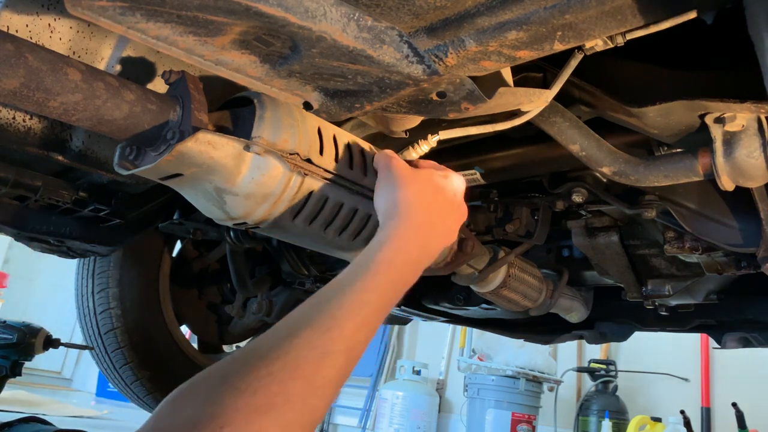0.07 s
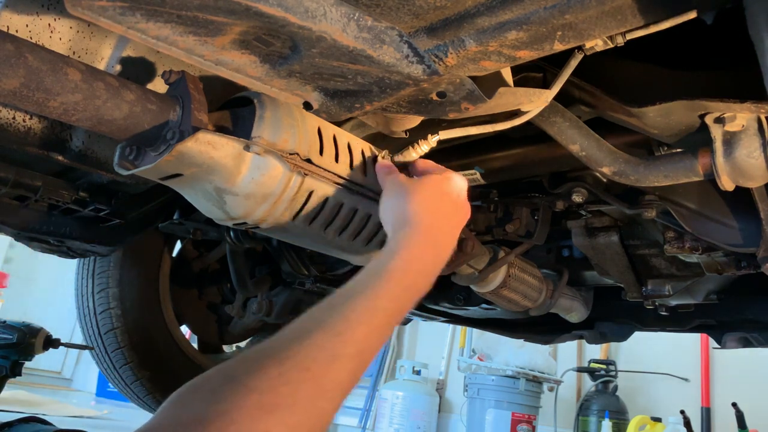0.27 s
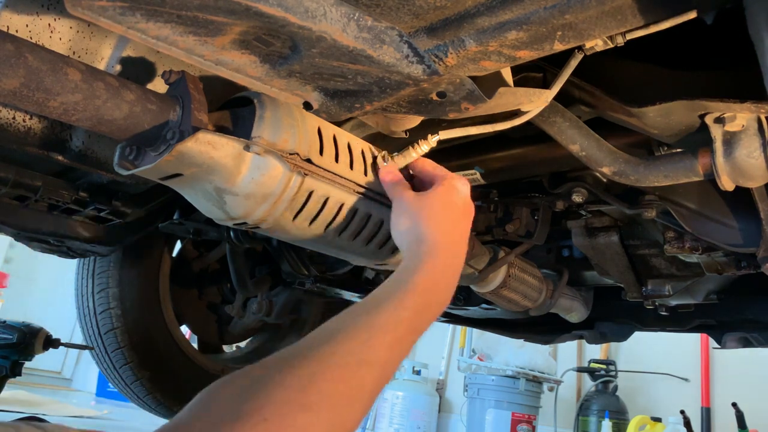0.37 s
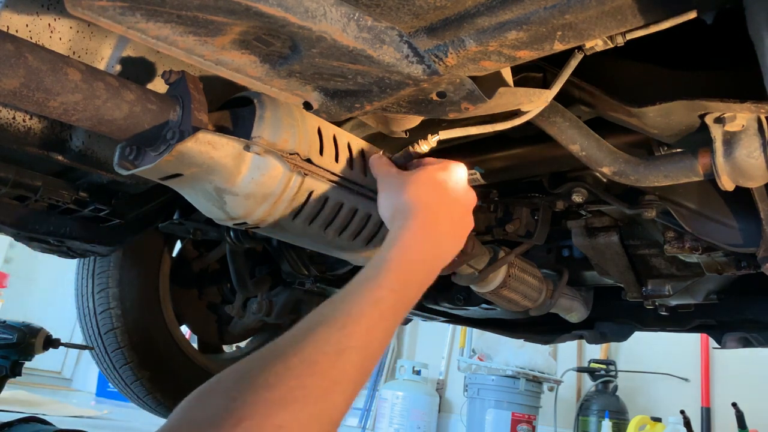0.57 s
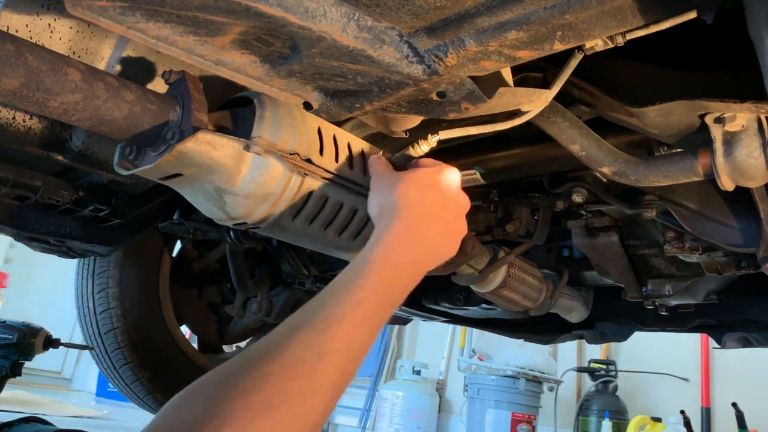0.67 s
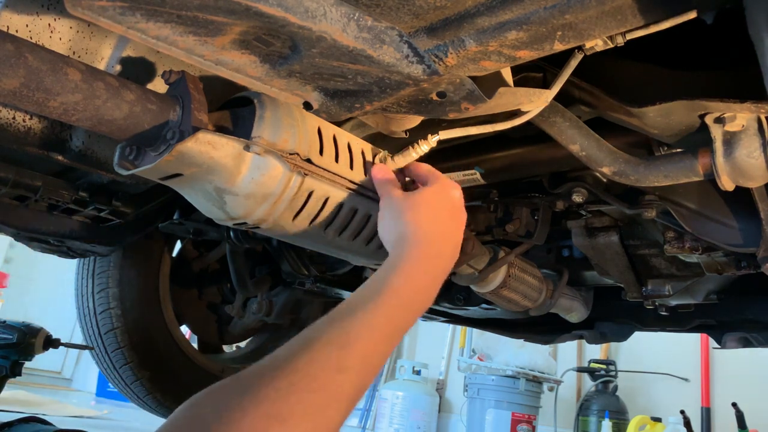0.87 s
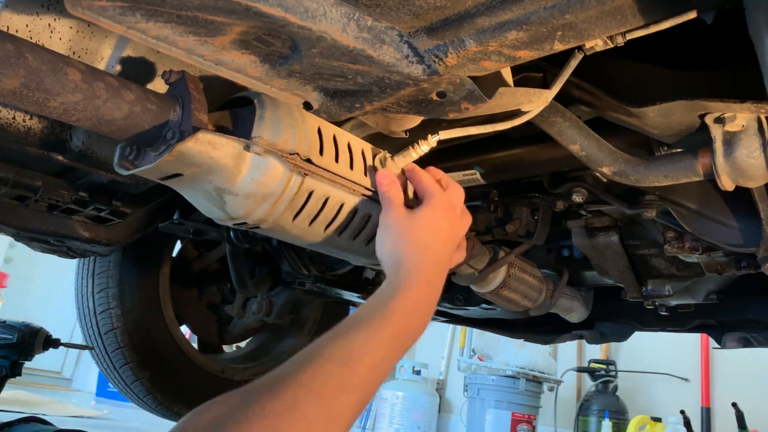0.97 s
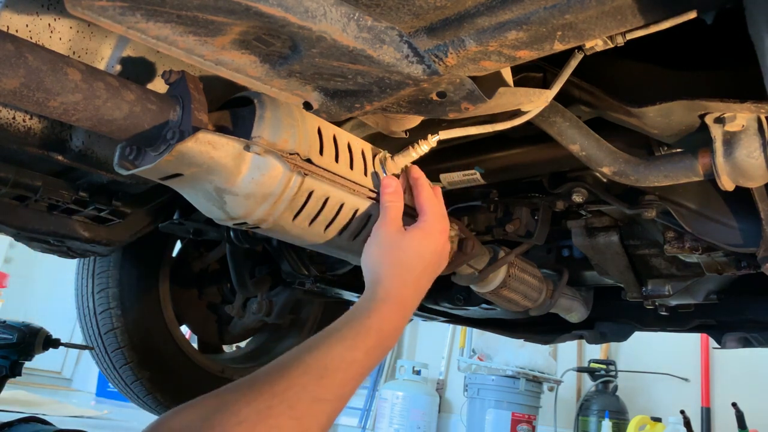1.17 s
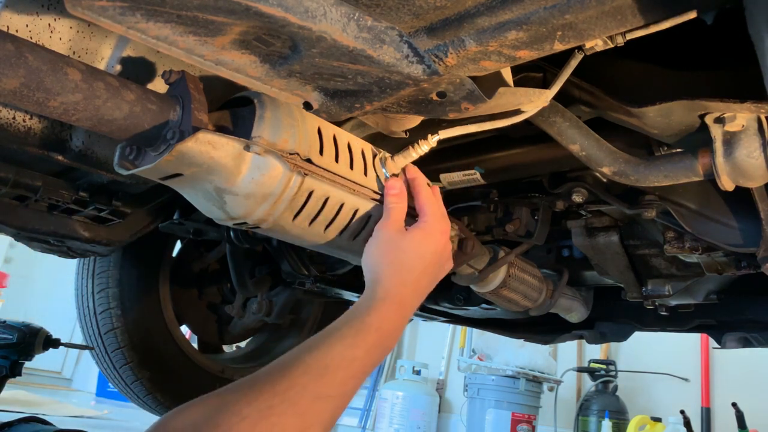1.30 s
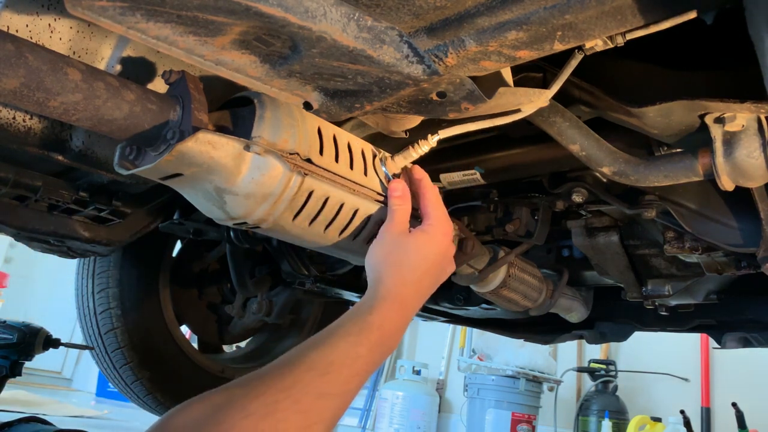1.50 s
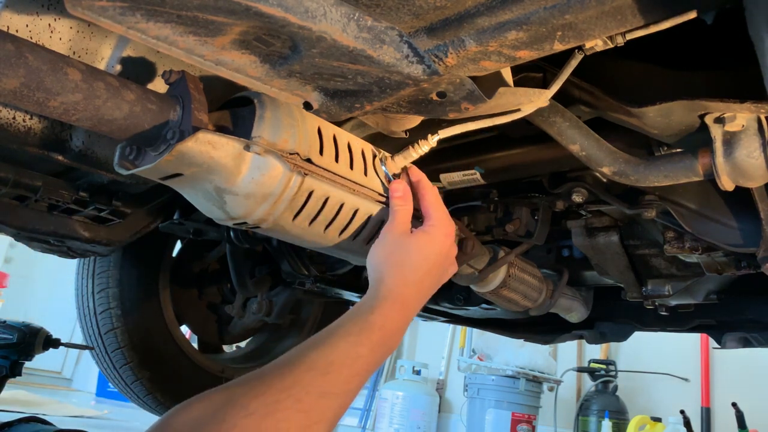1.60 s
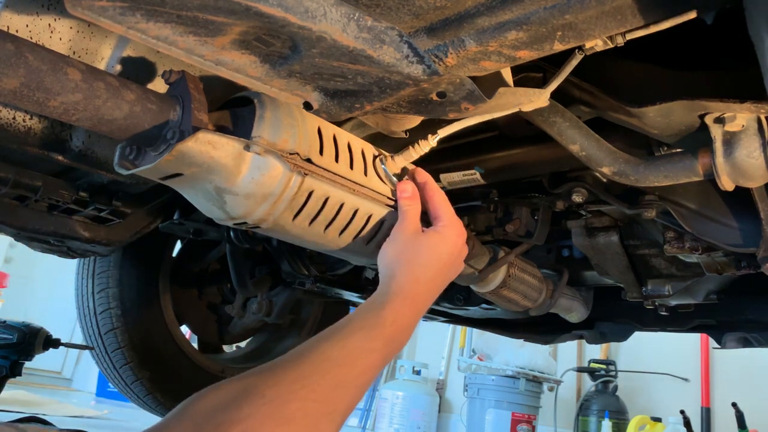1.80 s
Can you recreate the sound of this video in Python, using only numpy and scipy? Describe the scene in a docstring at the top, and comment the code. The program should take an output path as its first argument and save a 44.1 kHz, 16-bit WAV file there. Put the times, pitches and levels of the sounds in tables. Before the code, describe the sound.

A loose metal heat shield under a car knocks dully several times between about 0.3 and 0.6 seconds, while a low rumble and rustle swell at the microphone. At 0.8 seconds it snaps free with one loud, bright clank, chattering and ringing briefly. Faint finger scrapes follow, with a light tap near 1.15 seconds and a soft knock near 1.7. A faint wavering hum fills the garage throughout.

```python
"""Under a car in a garage, a hand works a loose steel heat shield on the exhaust, over a wavering hum.
At first the held shield knocks dully, its modes damped by the hand, while a low rumble and a rustle
swell at the microphone. At 0.78 s it snaps free with one bright clank: the edge chatters on the pipe
and the sheet rings in free vibration. Then the fingers scrape along it in stick-slip friction, tap it,
and settle on it at 1.28 s, damping the ring; faint strokes and one light knock follow."""
import sys
import numpy as np
from scipy import signal
from scipy.fft import rfft, irfft, next_fast_len
from scipy.io import wavfile
from scipy.ndimage import uniform_filter1d, map_coordinates

SR = 44100
rng = np.random.default_rng(int(sys.argv[2]) if len(sys.argv) > 2 else 0)


def unload_wav(signal):
    """Save mono or channel-first audio to the path in sys.argv[1] as 16-bit WAV at rate SR, clipped to [-1, 1]."""
    wavfile.write(
        sys.argv[1],
        SR,
        np.round(np.clip(np.atleast_2d(signal).T, -1, 1) * 32767).astype(np.int16),
    )


N = 81585

# Levels are relative: each source applies its own gain, and spectra give shape only.
# modes of the shield: (frequency [Hz], level when held [dB], level when free [dB], t60 [s])
SHIELD_MODES = [(307.5, -35, -37, 0.96), (533, -23, -22.5, 0.22), (781.4, -17, -33, 0.29),
                (1013, -23, -24.5, 0.42), (1139.7, 2, -13, 0.17), (1248, 1, -21.5, 0.094),
                (1301, -19.5, 9.5, 0.049), (1439, -0.5, -14.5, 0.19), (1509, -4.5, -21, 0.65),
                (1631, -22.5, -28, 0.97), (1708, -24.5, -8.5, 0.057), (1828, -0.5, 7.5, 0.049),
                (1977, 5, -19, 0.15), (2213, -3, -13.5, 0.14), (2625, -0.5, -13.5, 0.14),
                (2790, -18, -24, 0.065), (3375, -9, -17.5, 0.34), (3620, -28.5, -17.5, 0.31),
                (3900, -14, -12, 0.12), (4615, -26, -13, 0.13), (5120, -6.5, -11.5, 0.099),
                (7150, -26, -27, 0.18), (8340, -28.5, -19, 0.12), (10700, -42.5, -8.5, 0.067)]
# knocks of the held shield, and a fingertip's double tap on the freed one:
# (time [s], level [dB], tilt [dB/octave], note of the struck patch [Hz], level of that note [dB])
KNOCKS = [(0.001, -42.5, 0, 1400, -12), (.062, -40.5, -3, 2350, -9), (.353, -22.5, -1, 1914, 7.5),
          (.359, -18.5, -2, 2257, -3.5), (.528, -34.5, 0, 1190, 3.5), (.532, -27.5, -3, 1290, 0),
          (.5955, -27, 1.5, 940, 0.5), (.6005, -21, 0, 2495, -5.5), (.608, -25.5, -6, 1867, -6),
          (.738, -40, -7, 1142, -2), (1.674, -44, 2, 1261, 2)]
TAPS = [(1.1545, -40.5, 9, 1775, -0.5), (1.1575, -40.5, -4.5, 2140, -1.5)]
# rebounds of the edge on the pipe: (time [s], level [dB], tilt [dB/octave])
CHATTER = [(0.7804, -4, -2.5), (0.782, 1, 1.5), (0.79, -1, -3.5), (0.7948, -5.5, -2.5), (0.804, -14, 0.5),
           (.811, -16.5, 0.5)]
# dense modes of the sheet, knocked and snapping: (frequency [Hz], spectral density [dB])
KNOCK_SPECTRUM = [(200, -42.5), (700, -12), (1200, -1), (1700, -4), (2400, 1), (3300, -7), (5200, -9.5),
                  (6500, -15), (8000, -15), (15000, -37)]
SNAP_SPECTRUM = [(200, -38), (850, -16.5), (1300, -4.5), (2200, -5.5), (2800, -8.5), (3700, -3),
                 (5000, -15.5), (6000, -19.5), (7000, -8.5), (8100, -2.5), (9300, -20.5), (11000, -12),
                 (15500, -20)]
# finger strokes: (time [s], duration [s], level [dB], tilt [dB/octave])
STROKES = [(0.23, 0.029, -38.5, 7.5), (0.063, .045, -44.5, -6.5), (0.745, 0.044, -42.5, 0.5),
           (0.923, 0.019, -34, 3), (1.05, 0.042, -48, 2.5), (1.102, 0.036, -51, 1),
           (1.132, 0.028, -39.5, 4), (1.282, 0.058, -52, 0.5), (1.442, 0.065, -61, 0),
           (1.493, 0.041, -62.5, -1.5), (1.565, 0.011, -58, -2.5), (1.651, 0.066, -46, 1),
           (1.808, 0.057, -55, 2)]
# friction noise of the sheet: (frequency [Hz], spectral density [dB])
SCRAPE_SPECTRUM = [(300, -24), (850, -6.5), (1250, -2), (1650, -4.5), (2400, -3.5), (3000, -8), (4600, -11),
                   (6000, -14.5), (8000, -9.5), (9200, -22), (11000, -10.5), (15500, -19.5)]
# resonances that rubbing excites: (frequency [Hz], half-width [Hz], gain [dB])
SCRAPE_RESONANCES = [(1310, 130, 5), (1836, 130, 3.5), (2200, 42, -1.5), (3624, 34, 6), (4620, 210, 5.5),
                     (6600, 29, 7.5), (7690, 130, 2.5), (8700, 180, 11.5)]
# reverberation time of the garage: (frequency [Hz], t60 [s])
GARAGE_T60 = [(150, 0.13), (600, 0.69), (1500, 0.3), (4000, 0.31), (8000, 0.13), (14000, 0.11)]
# rumble at the microphone: (time [s], deep band level [dB], upper band level [dB])
RUMBLE_ENVELOPE = [(0, -69, -58), (.15, -47, -57), (.19, -32, -41), (.23, -26.5, -39), (.26, -24.5, -37.5),
                   (.295, -13, -24), (.325, -18.5, -27.5), (.36, -26.5, -26.5), (.43, -22.5, -31),
                   (.52, -30.5, -46.5), (.57, -30.5, -47), (.68, -37, -48.5), (.85, -41.5, -53),
                   (1.05, -43, -80), (1.3, -58, -65), (1.85, -60.5, -59.5)]
# rubbing close to the microphone: (time [s], level [dB])
RUSTLE_ENVELOPE = [(0, -50), (.176, -62.5), (.185, -35.5), (.24, -38.5), (.255, -34), (.3, -34.5),
                   (.35, -35.5), (.45, -50), (.55, -49), (.7, -58), (.9, -103.5)]
# the rumble's two bands and the rustle: (frequency [Hz], spectral density [dB])
DEEP_SPECTRUM = [(10, -6.5), (25, -13.5), (42, 4.5), (62, -9.5), (78, -5.5), (95, -3), (125, -14),
                 (250, -77)]
UPPER_SPECTRUM = [(70, -17.5), (130, -9.5), (180, -0.5), (260, -9.5), (400, -17), (600, -23), (1200, -50)]
RUSTLE_SPECTRUM = [(240, -28), (400, 1.5), (550, -7.5), (850, -12), (1500, -10), (3000, -13.5), (5700, -19),
                   (8300, -20), (11300, -29.5), (15500, -39.5)]
# the wavering hum: (time [s], frequency [Hz], level [dB])
HUM_CONTOUR = [(0, 94.5, -55.5), (.08, 100.3, -40.5), (.14, 97.23, -44.5), (.65, 95.9, -42.5),
               (.95, 98.9, -44.5), (1.09, 103.6, -41), (1.25, 96.5, -48), (1.31, 99.2, -40.5),
               (1.38, 103.9, -47.5), (1.43, 97.6, -46), (1.65, 99.17, -52), (1.71, 104.2, -43.5),
               (1.75, 108.6, -54), (1.8, 111.5, -37.5), (1.85, 113, -45)]
# faint tones above the hum: (frequency [Hz], level [dB])
HUM_TONES = [(193.8, -66), (263.8, -69), (339, -68), (387.6, -66)]
# ambient noise of the garage: (frequency [Hz], spectral density [dB])
AIR_SPECTRUM = [(20, -30.5), (40, -19), (65, 1), (85, -11.5), (115, 3), (150, -10.5), (195, -23),
                (260, -13), (380, -20), (520, -27.5), (800, -34), (1250, -32.5), (2000, -36), (5000, -40),
                (8000, -44), (15000, -53)]
# likeness of the left and right channels: (frequency [Hz], correlation [-1 to 1])
STEREO_CORRELATION = [(30, .996), (70, .98), (125, .96), (250, .82), (500, .4), (1200, .65), (2000, -.1),
                      (4000, .28), (6000, .05), (8000, .45), (9100, .15), (9750, -.96), (10500, 0),
                      (12400, .2), (13500, -.85), (14600, .1)]
# level difference between the channels: (frequency [Hz], left over right [dB])
STEREO_BALANCE = [(40, 1.5), (250, 1.1), (500, 3), (1200, 3.5), (2200, 3.5), (4000, -0.5)]


def snap(snap_s=0.7815, touch_s=1.28, level_db=-10.5):
    """Free vibration: the released shield chatters on the pipe and rings until the fingers damp it."""
    t = since(snap_s)
    free_db = [free for _, _, free, _ in SHIELD_MODES]
    finger_damping = decay(since(touch_s), t60=0.28)
    modes = ring(t, free_db, slope_db=0, build_s=0.0046, scatter_db=2.5) * finger_damping
    chatter = np.zeros((2, N))
    for start_s, db, slope_db in CHATTER:
        chatter += amp(db) * clatter(since(start_s), SNAP_SPECTRUM, slope_db, rise_s=0.00027,
                                     hold_s=0.0027, t60=0.031, tail_db=-20, tail_t60=0.13)
    lingering = noise(SNAP_SPECTRUM) * np.minimum(t / 0.0081, 1) * decay(t, t60=0.33)
    return amp(level_db) * (modes + amp(-5) * chatter + amp(-26) * lingering)


def knocks():
    """Damped vibration: the shield strikes the pipe dully while the hand absorbs its energy."""
    held_db = [held for _, held, _, _ in SHIELD_MODES]
    return impacts(KNOCKS, held_db, ring_db=-7.5, clatter_db=-3, hand_t60=0.48, patch_t60=0.081)


def taps():
    """Impulse excitation: a fingertip sets the freed shield's modes clinking."""
    free_db = [free for _, _, free, _ in SHIELD_MODES]
    return impacts(TAPS, free_db, ring_db=-5, clatter_db=-8, hand_t60=0.36, patch_t60=0.09)


def impacts(blows, levels_db, ring_db, clatter_db, hand_t60, patch_t60):
    """Impulse response: each blow excites hand-damped modes, a clatter and the struck patch's note."""
    out = np.zeros((2, N))
    for start_s, db, slope_db, patch_hz, patch_db in blows:
        t = since(start_s)
        # the changing grip detunes the modes from blow to blow
        modes = ring(t, levels_db, slope_db, build_s=0.00113, scatter_db=2.0, detune=0.008)
        damped = modes * decay(t, hand_t60)
        crash = clatter(t, KNOCK_SPECTRUM, slope_db, rise_s=0.00079,
                        hold_s=0.00036, t60=0.096, tail_db=-15.5, tail_t60=0.19)
        patch = np.sin(2 * np.pi * patch_hz * t) * decay(t, patch_t60)
        out += amp(db) * (amp(ring_db) * damped + amp(clatter_db) * crash + amp(patch_db) * patch)
    return out


def ring(t, levels_db, slope_db, build_s, scatter_db, detune=0, wander_rad=0.35):
    """Modal superposition: decaying sinusoids add, each out of phase between the two channels."""
    out = np.zeros((2, N))
    for (hz, _, _, t60), db in zip(SHIELD_MODES, levels_db):
        wander = wander_rad * fluctuation(t, per_s=60)  # the loose sheet rings unsteadily
        detuned_hz = hz * (1 + detune * rng.standard_normal())
        phase = 2 * np.pi * (detuned_hz * t + rng.random()) + wander
        channel_phase = stereo_angle(hz) * np.array([[1], [-1]]) * rng.choice([-1, 1])
        gain = amp(db + scatter_db * rng.standard_normal()) * tilt(hz, slope_db)
        out += gain * decay(t, t60) * np.sin(phase + channel_phase)
    build_up = 1 - np.exp(-(t / build_s) ** 2)
    return out * build_up


def clatter(t, spectrum, slope_db, rise_s, hold_s, t60, tail_db, tail_t60):
    """Modal overlap: dense modes merge in a crash that lingers softly between shield and floor pan."""
    rippled = filtered(rng.standard_normal((2, N)), modal_ripple())
    attack = 1 - np.exp(-t / rise_s)
    after_hold = np.maximum(t - hold_s, 0)
    release = decay(after_hold, t60) + amp(tail_db) * decay(after_hold, tail_t60)
    return coloured(rippled, spectrum, slope_db) * attack * release


def modal_ripple(depth_db=3.6, spacing_hz=55):
    """Statistical response: the sheet's many close modes act as a random gain along frequency."""
    knots = rng.standard_normal(int(SR / spacing_hz))
    return lambda hz: amp(depth_db * map_coordinates(knots, [hz / spacing_hz]))


def scrapes(slips_per_s=1500, hiss_db=-2, rise_s=0.016):
    """Stick-slip friction: fingers on the rusty sheet drive its resonances with tiny slips and hiss."""
    out = np.zeros((2, N))
    for start_s, length_s, db, slope_db in STROKES:
        slips = unit_rms(rng.standard_normal((2, N)) * (rng.random(N) < slips_per_s / SR))
        ripple = modal_ripple()
        friction = slips + amp(hiss_db) * rng.standard_normal((2, N))
        rubbed = filtered(friction, lambda hz: scrape_resonance(hz) * ripple(hz))
        stroke = np.minimum(since(start_s) / rise_s, 1) * decay(since(start_s + length_s), t60=0.13)
        out += amp(db) * stroke * coloured(rubbed, SCRAPE_SPECTRUM, slope_db)
    return out


def scrape_resonance(hz):
    """Resonance: the rubbed sheet's gain follows a bell-shaped curve about each centre frequency."""
    return amp(sum(db / (1 + ((hz - centre) / width) ** 2) for centre, width, db in SCRAPE_RESONANCES))


def garage(x, build_s=0.018):
    """Reverberation: diffuse reflections build up, then each frequency decays at its own rate."""
    hz, t, bands = signal.stft(rng.standard_normal((2, SR)), SR, nperseg=256)
    bands = bands * decay(t, at_frequency(GARAGE_T60, hz)[:, None]) * np.minimum(t / build_s, 1)
    _, tail = signal.istft(bands, SR, nperseg=256)
    return signal.fftconvolve(x, tail / np.linalg.norm(tail[0]), axes=1)[:, :N]


def rumble_and_rustle(grit_db=2.5):
    """Amplitude-modulated noise: low buffeting and gritty rubbing swell at the microphone."""
    deep_db, upper_db = curves(RUMBLE_ENVELOPE)
    rustle_db, = curves(RUSTLE_ENVELOPE)
    grit = unit_rms(amp(grit_db * fluctuation(since(0), per_s=400)))  # the rubbing catches and slips
    deep = amp(deep_db) * steadied(noise(DEEP_SPECTRUM), window_s=0.0464)
    upper = amp(upper_db) * steadied(noise(UPPER_SPECTRUM), window_s=0.0337)
    rustle = amp(rustle_db) * grit * noise(RUSTLE_SPECTRUM)
    return deep + upper + rustle


def background(waver_db=2, air_db=-49.5):
    """Modulated tones: a hum wavers in pitch and level, fainter tones in level, over ambient noise."""
    t = since(0)
    hz, db = curves(HUM_CONTOUR)
    hum = amp(db) * np.sin(2 * np.pi * (np.cumsum(hz) / SR + rng.random()))
    for tone_hz, tone_db in HUM_TONES:
        waver = fluctuation(t, per_s=6, span_s=2.7)
        hum += amp(tone_db + waver_db * waver) * np.sin(2 * np.pi * (tone_hz * t + rng.random()))
    return np.sqrt(2) * hum + amp(air_db) * noise(AIR_SPECTRUM)


def noise(spectrum):
    """Spectral shaping: white noise becomes coloured stereo noise of rms 1."""
    return coloured(rng.standard_normal((2, N)), spectrum)


def coloured(x, spectrum, slope_db=0):
    """Mid-side mixing: two independent signals become a shaped, partly correlated pair of rms 1."""
    def response(hz):
        angle = stereo_angle(hz)
        return amp(at_frequency(spectrum, hz)) * tilt(hz, slope_db) * [np.cos(angle), np.sin(angle)]
    mid, side = filtered(x, response)
    return unit_rms(np.array([mid + side, mid - side]))


def stereo_angle(hz):
    """Correlation is the cosine of a phase difference; this is half that difference, in radians."""
    return np.arccos(np.clip(at_frequency(STEREO_CORRELATION, hz), -1, 1)) / 2


def filtered(x, response):
    """Linear filtering: the spectrum of x is multiplied by a frequency response."""
    size = next_fast_len(N + 8192)
    return irfft(rfft(x, size) * response(np.fft.rfftfreq(size, 1 / SR)), size)[..., :N]


def steadied(x, window_s):
    """Division by the running rms evens out the chance swells of noise."""
    power = uniform_filter1d(np.mean(x ** 2, axis=0), int(window_s * SR))
    return x / np.sqrt(np.abs(power) + 1e-6)


def fluctuation(t, per_s, span_s=2):
    """Spline interpolation joins random values into a smooth drift."""
    return map_coordinates(rng.standard_normal(int(span_s * per_s)), [t * per_s])


def tilt(hz, slope_db):
    """Spectral tilt: the gain of a slope in dB per octave about 2 kHz, flat below 500 Hz."""
    return amp(slope_db * np.log2(np.maximum(hz, 500) / 2000))


def decay(t, t60):
    """Exponential decay: 60 dB in t60 seconds."""
    return np.exp(-np.log(1000) * t / t60)


def since(start_s):
    """Elapsed seconds after a moment, zero before it."""
    return np.maximum(np.arange(N) / SR - start_s, 0)


def curves(rows):
    """Linear interpolation in time: one value per sample for each later column."""
    times, *columns = np.transpose(rows)
    return [np.interp(since(0), times, column) for column in columns]


def at_frequency(points, hz):
    """Interpolation on a logarithmic frequency axis."""
    frequencies, values = np.transpose(points)
    return np.interp(np.log(hz + 1), np.log(frequencies + 1), values)


def unit_rms(x):
    """Normalisation to rms 1."""
    return x / np.sqrt(np.mean(x ** 2) + 1e-20)


def amp(db):
    """Amplitude ratio of a level in decibels."""
    return 10 ** (np.asarray(db) / 20)


def scene(garage_db=-12.5):
    """Superposition: shield, room, rumble and hum add; a level difference sets them a little left."""
    metal = knocks() + snap() + taps() + scrapes()
    mix = metal + amp(garage_db) * garage(metal) + rumble_and_rustle() + background()
    left_right = np.array([[0.5], [-0.5]])
    return filtered(mix, lambda hz: amp(at_frequency(STEREO_BALANCE, hz) * left_right))


def record(dry, top_hz=15900):
    """Band limiting: an ideal low-pass filter removes the highest treble."""
    return filtered(dry, lambda hz: hz < top_hz)


dry = scene()
out = record(dry)
unload_wav(out)
```